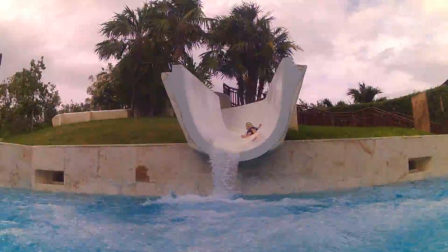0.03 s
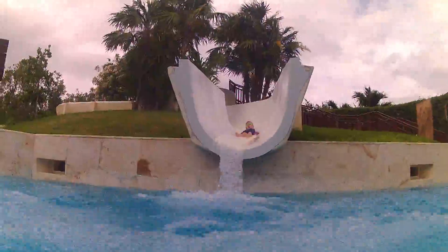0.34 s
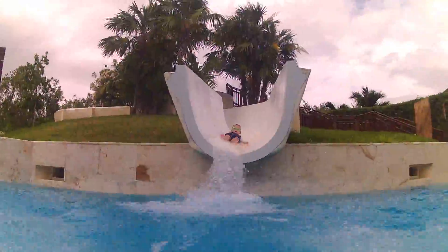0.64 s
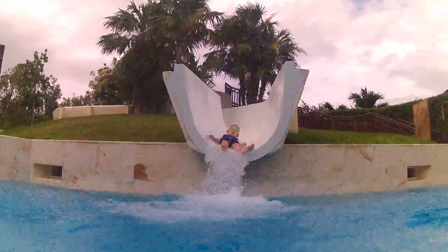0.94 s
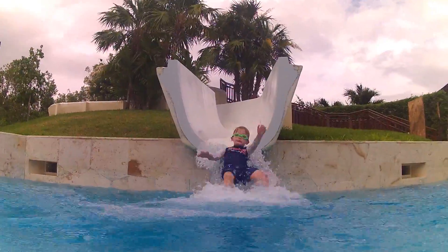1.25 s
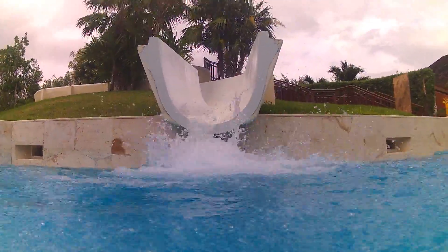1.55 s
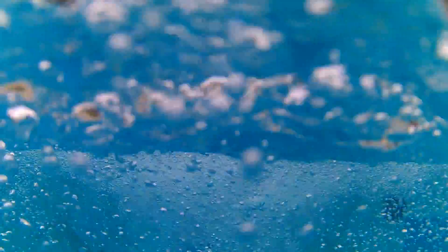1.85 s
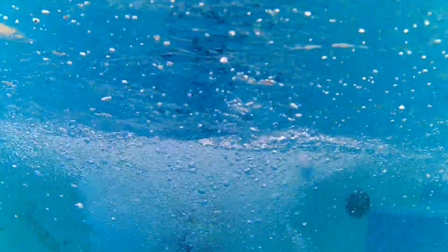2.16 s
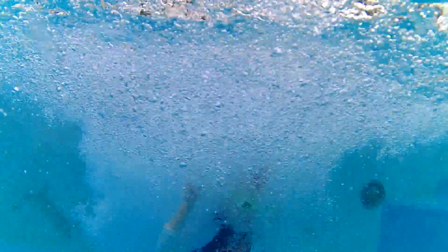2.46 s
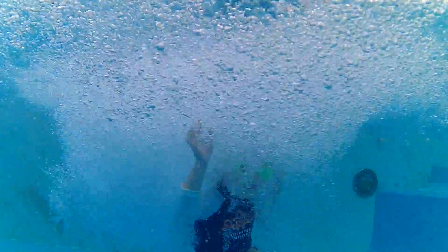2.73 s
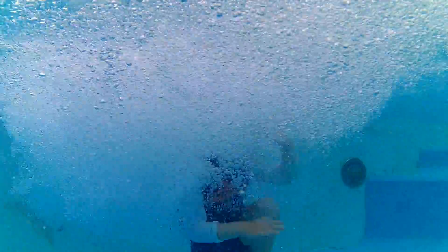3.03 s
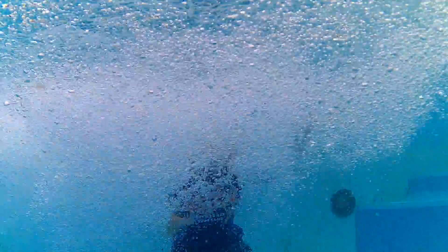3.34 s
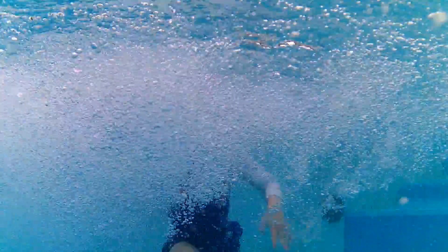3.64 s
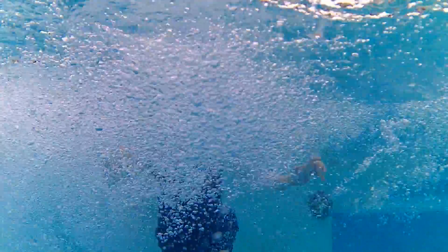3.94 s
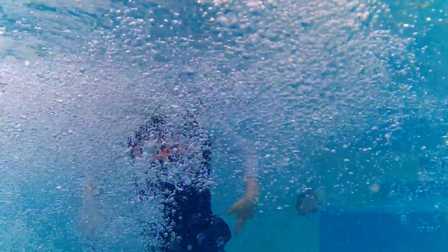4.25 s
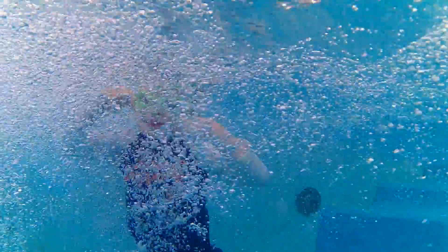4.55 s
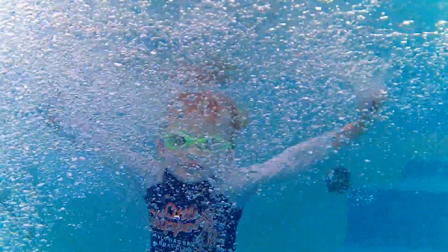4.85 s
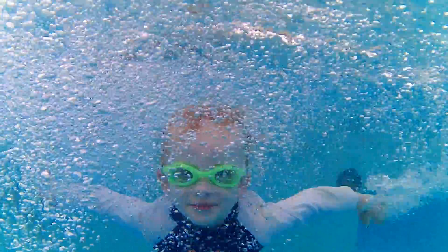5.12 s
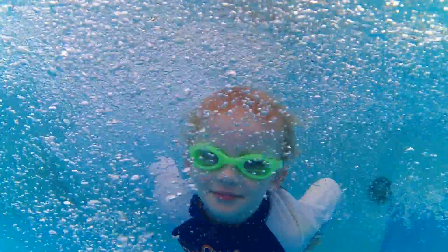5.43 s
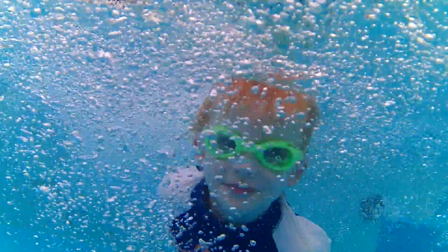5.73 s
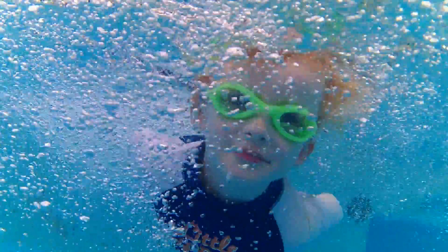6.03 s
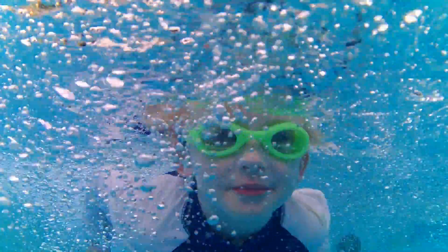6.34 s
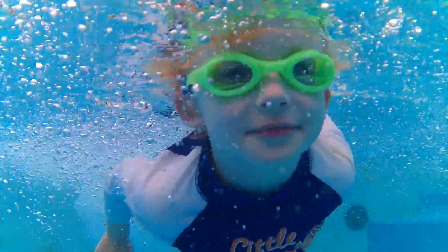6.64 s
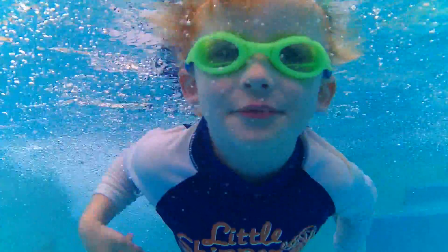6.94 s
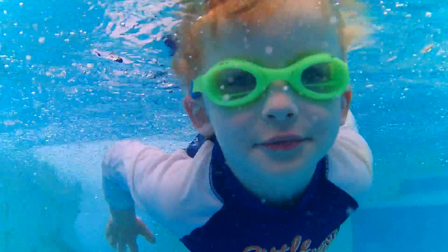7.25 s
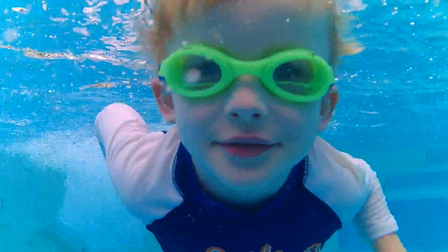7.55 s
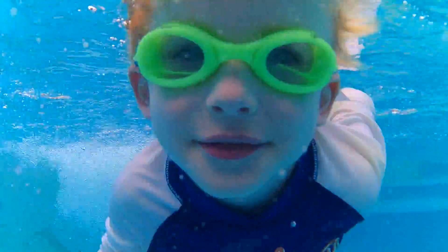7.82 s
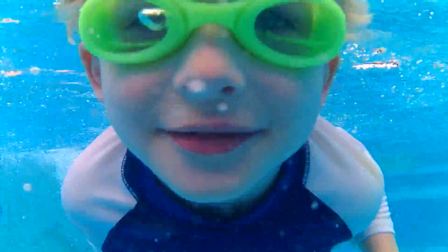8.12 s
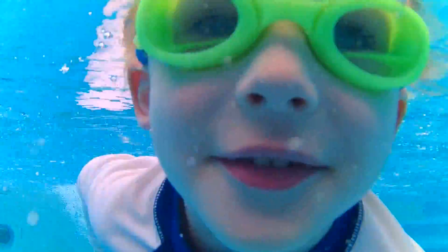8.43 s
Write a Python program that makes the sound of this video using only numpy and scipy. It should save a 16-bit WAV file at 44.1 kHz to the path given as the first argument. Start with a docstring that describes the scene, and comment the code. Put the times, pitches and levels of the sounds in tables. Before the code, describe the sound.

Water pours off a slide into a pool with a soft, steady wash that swells slightly just after 1 second. At about 1.3 seconds a child lands in the water, and loud, close splashes, spray and waves slap and thud against the microphone's waterproof case. Around 1.8 seconds the case dips under, and the slaps turn into deeper gulps. From 2.3 seconds everything is muffled and quieter: a low rumble and a hollow, gurgling boom, with a quick flutter of bubble taps and a strong glug near 2.8 seconds. Small bubbles fizz, trickle and tick, with two sharp clicks just before 4 seconds. The gurgling swells around 5 seconds. Soft bumps touch the case near 5 and 7.5 seconds. Scattered glugs and ticks continue as the boom eases toward the end at about 8.6 seconds. A faint electronic hiss and high whine lie underneath throughout.

```python
"""Off the water slide and under

A child shoots off a water slide into a pool, in front of a camera in a waterproof case at the waterline.
The slide's outflow washes steadily, then spray and waves slap the case and it sinks into the bubbles.
Under water the case booms near 550 Hz and large bubbles glug. Small ones tick, flutter and fizz,
and the case is bumped a few times. The camera's electronics add a faint hiss and whine."""
import sys
import numpy as np
from scipy import signal
from scipy.fft import rfft, irfft
from scipy.io import wavfile
from scipy.ndimage import uniform_filter1d, minimum_filter1d

SR = 44100
rng = np.random.default_rng(int(sys.argv[2]) if len(sys.argv) > 2 else 0)


def store_pcm(level_fs):
    """Save levels as 16-bit WAV."""
    pcm = np.round(np.clip(level_fs, -1, 1) * 32767).astype(np.int16)
    wavfile.write(sys.argv[1], SR, np.atleast_2d(pcm).T)


N = 378378
TIME = np.arange(N) / SR  # seconds through the whole scene
SHORT = np.arange(6000) / SR  # seconds through one short sound

# Tone curves say how strong the lows and highs of a sound are.
# Each row: frequency in Hz, relative strength in dB.
OUTFLOW_TONE = [(20, 5.5), (60, -17), (250, -6), (750, -9.5), (1300, -1), (1550, -8), (1850, 1),
                (2400, -14), (2800, -21), (3100, -18), (3500, -25), (4300, -15.5), (5500, -20),
                (6200, -28.5), (7000, -26.5), (9000, -33.5), (16000, -32)]  # water pouring off the slide
RUMBLE_TONE = [(8.8, -30), (15, 6), (54, 0), (107, 0.5), (151, -15.5), (200, -16.5), (260, -48.5),
               (440, -120)]  # currents pushing on the case
HEAVE_TONE = [(12, -32), (20, -7), (128, -7), (248, -9), (278, -10.5), (344, -12.5), (400, -8.5),
              (520, -16), (880, -120)]  # the low shove of a wave
CLATTER_TONE = [(120, -43), (200, -2.5), (340, -17), (401, -39), (440, -20.5), (579, 1.5), (806, 3),
                (867, 1.5), (1480, -12), (1710, 3.5), (2750, -25.5), (4120, -35.5), (7410, -44),
                (15100, -41), (16000, -22.5)]  # water striking the plastic
SPRAY_CRACK_TONE = [(500, 7), (3000, -3), (6000, 1), (10000, 0), (15000, -1)]  # spray cracking brightly on the bare case
BOOM_TONE = [(150, -39), (300, -17), (400, -7.5), (480, -2), (550, 9), (630, -3), (720, -13), (900, -26.5),
             (1300, -53), (2500, -85.5)]  # the case booming under water
FIZZ_TONE = [(600, 9), (1050, -2.5), (1250, -7.5), (1480, -0.5), (1800, -5.5), (2300, -8), (3000, -10.5),
             (3700, -18), (4300, -11.5), (4900, -18.5), (5600, -16.5), (7000, -25), (14000, -26)]  # tiny bubbles in the cloud
KNOCK_TONE = [(200, -14), (550, 6.5), (1050, -8.5), (1400, -12), (2000, -41), (8000, -51)]  # one bubble tapping the case

# Small bubbles and drops ticking on the case. Each row: start in seconds, ping level in dB, ping pitch
# in Hz, ping ring time in seconds, low note level in dB, low note pitch in Hz, crack level in dB.
BUBBLE_TICKS = [(0.082, -27, 4500, .027, -48, 1820, -62), (.685, -25, 4840, 0.015, -40, 1280, -60),
                (2.472, -36.5, 2950, 0.021, -33.5, 895, -38), (2.624, -34, 4180, .022, -48, 1880, -50),
                (2.641, -34, 5830, .02, -50, 1930, -60), (2.699, -26.5, 2500, 0.019, -52, 970, -47),
                (2.815, -22, 5930, 0.01, -28.5, 826, -29.5), (3.835, -5.5, 2180, 0.019, -30.5, 2010, -27.5),
                (3.895, -52, 2090, .02, -34.5, 975, -65), (3.931, 2.5, 2890, 0.0074, -40, 1790, -42),
                (3.99, -24.5, 5400, 0.011, -41, 1840, -36), (4.031, -41, 3000, 0.018, -37.5, 970, -70),
                (4.275, -16.5, 12400, 0.0047, -30.5, 1910, -29.5),
                (4.566, -24.5, 2740, 0.016, -45, 970, -52), (4.695, -28.5, 3050, 0.02, -61, 836, -71),
                (5.043, -20, 5830, 0.0097, -51, 2420, -36), (5.096, -31, 6200, .0096, -47, 1490, -32.5),
                (5.289, -39, 6200, 0.013, -59, 1390, -65), (5.524, -39, 2800, .017, -27, 895, -60),
                (5.589, -50, 1900, 0.039, -24.5, 1276, -68), (5.795, -29, 3160, .016, -31, 1000, -60),
                (5.81, -12, 2540, 0.0082, -15, 817, -59), (6.409, -39.5, 4180, 0.013, -45, 1220, -70),
                (7.832, -52, 2030, .02, -33.5, 1454, -72), (7.875, -30.5, 4180, 0.015, -59, 1410, -58),
                (7.885, -34, 5150, 0.051, -60, 1390, -48), (8.552, -32.5, 2000, 0.056, -30.5, 860, -61)]
# Waves sloshing over the case.
# Each row: start in seconds, length in seconds, splatter level in dB, heave level in dB.
SLOSHING_WAVES = [(1.25, 0.13, -64, -36), (1.381, 0.017, -22, -25.5), (1.465, 0.16, -20, -21),
                  (1.667, 0.15, -25, -35), (1.829, 0.037, -13, -22), (1.932, 0.091, -22.5, -19.5),
                  (2.031, 0.089, -22, -49), (2.189, 0.054, -44.5, -36.5)]
# Slaps of water on the case. Each row: start in seconds, level in dB, air pocket pitch in Hz,
# spray level in dB, droplet pitch in Hz.
WATER_SLAPS = [(1.331, -25, 1160, -40, 4000), (1.358, -24, 1900, -32.5, 2480), (1.373, -7, 1680, -27, 2920),
               (1.379, -7.5, 1630, -42, 2550), (1.396, 0.5, 1300, -12.5, 3900),
               (1.422, -10, 1200, -27, 2520), (1.441, -7.5, 1740, -16, 3020),
               (1.448, -2, 1890, -19.5, 3760), (1.457, -10.5, 1120, -18, 3970),
               (1.468, 2, 1320, -16.5, 3050), (1.533, 0, 1630, -14.5, 3300), (1.543, -19, 1640, -12, 4660),
               (1.554, -16, 1840, -13, 4650), (1.559, 9, 1282, -5.5, 4310), (1.564, -7, 1280, -9.5, 5080),
               (1.581, -19, 1800, -13, 4230), (1.589, -3.5, 1090, -16, 4360),
               (1.604, -10, 1680, -13.5, 3000), (1.616, -4.5, 1765, -17.5, 2520),
               (1.622, 4, 974, -13, 3170), (1.668, 4.5, 1645, -24, 2520), (1.683, -16, 1690, -21, 3400),
               (1.696, -1, 884, -11, 3400), (1.709, -6, 1090, -19, 3300), (1.72, -6, 1820, -17, 4460),
               (1.751, -2.5, 1680, -18, 2800), (1.757, -25, 1270, -17.5, 2540),
               (1.793, -11, 1230, -18, 3870), (1.821, -12, 960, -9.5, 4590), (1.84, -4.5, 1030, -23, 2480),
               (1.85, -4.5, 477, -8, 3960), (1.856, -4, 845, -7.5, 2340), (1.892, -6, 670, -37, 2520),
               (1.907, -16, 377, -28, 6000), (1.938, -3, 463, -17.5, 3500), (1.945, -2.5, 400, -18, 5600),
               (1.963, -7, 710, -17.5, 3720), (1.983, 1, 633, -32, 3200), (1.997, 3, 560, -11, 2650),
               (2.006, 5, 824, -4.5, 3100), (2.022, -18, 600, -12, 3070), (2.041, 1, 1243, -13, 2350),
               (2.056, -5, 605, -22.5, 4120), (2.075, -3, 514, -13.5, 3440), (2.085, -10.5, 527, -34, 2900),
               (2.098, 1, 1640, -4.5, 4150), (2.118, 2, 495, -18, 2290), (2.127, 2.5, 1580, -18, 4600),
               (2.16, -9, 714, -23, 5600), (2.182, 2.5, 492, -35, 2760), (2.211, -3, 566, -40, 2480),
               (2.22, -6.5, 852, -29.5, 3180), (2.232, -1.5, 490, -38, 3040), (2.24, 1, 586, -22.5, 3200),
               (2.263, -34, 535, -34, 2730), (2.761, -1.5, 602, -40, 2910), (2.767, -10, 610, -33, 3270)]
# Soft bumps on the case. Each row: start in seconds, level in dB, pitch in Hz, ring time in seconds.
CASE_BUMPS = [(1.47, -4.5, 124, 0.022), (1.531, -2.5, 128, 0.033), (1.586, 0, 127, 0.021),
              (1.666, -6.5, 123, 0.029), (4.907, -26.5, 111, 0.086), (4.97, -19, 193, .15),
              (5.072, -22, 231, 0.26), (5.811, -26.5, 113, 0.06), (7.437, -13, 102, 0.087),
              (7.457, -9, 106, 0.17), (7.916, -26.5, 129, 0.091), (8.496, -27, 66.7, 0.31)]
# Large bubbles breaking loose. Each row: start in seconds, level in dB, pitch in Hz, swell in seconds.
BIG_BUBBLES = [(2.196, -7, 954, .0037), (2.644, -10, 556, 0.0073), (2.774, 4, 612, 0.0078),
               (2.971, -17.5, 666, 0.0022), (3.393, -16, 476, .0031), (3.973, -17, 526, .006),
               (4.226, -19, 712, 0.0057), (4.673, -15, 524, .0043), (4.864, -16.5, 510, 0.0028),
               (4.92, -11, 470, 0.002), (4.931, -16.5, 511, 0.012), (4.961, -14.5, 556, .004),
               (5.124, -12, 511, 0.0026), (5.343, -15.5, 510, 0.011), (5.742, -10, 596, 0.0014),
               (5.809, -9, 772, 0.003), (6.313, -10, 572, 0.0028), (6.373, -12, 582, 0.0034),
               (7.348, -16.5, 542, 0.013), (7.655, -17.5, 565, 0.01), (7.942, -9.5, 589, 0.0068),
               (8.55, -4, 534, 0.0015)]
# The bubble cloud, stirred by the swimmer. Each row: time in seconds, boom level in dB, gurgle level in dB.
CLOUD_LEVELS = [(2.271, -19.5, -45), (2.42, -27, -41), (2.721, -15.5, -39.5), (2.9, -19, -42),
                (3.15, -26, -33.5), (3.47, -21.5, -39), (3.8, -25.5, -44), (4.15, -28, -45.5),
                (4.8, -25.5, -36), (4.94, -23.5, -25.5), (5.15, -22.5, -35), (5.55, -27.5, -41),
                (5.76, -23.5, -43), (5.95, -32.5, -44.5), (6.5, -28, -50.5), (7.1, -28, -48),
                (7.42, -24, -44), (8.2, -32.5, -55), (8.58, -34, -54)]
# Trickles of rising bubbles.
# Each row: start in seconds, length in seconds, chirp level in dB, crackle level in dB.
RISING_TRICKLES = [(2.46, 0.47, -48, -63.5), (2.99, 0.16, -52, -63), (3.835, .26, -50.5, -71),
                   (4.845, 0.7, -61, -63.5), (5.483, 0.43, -49.5, -70), (6.21, 0.43, -55, -66.5),
                   (7.015, 0.65, -54.5, -68.5), (7.652, 0.333, -50, -65.5), (8.227, 0.079, -52.5, -64)]

LANDING_S, DIP_S = 1.345, 1.8  # the child hits the water; the case dips in


def amp(db):
    """Turns decibels into a number to multiply a sound by."""
    return 10 ** (np.asarray(db) / 20)


def evened(x):
    """Scales a sound so its average level (rms) is 1."""
    return x / np.sqrt(np.mean(x ** 2) + 1e-20)


def peaked(x):
    """Scales a sound so its highest peak is 1."""
    return x / (abs(x).max() + 1e-12)


def steadied(x, size):
    """Keeps a sound's fine grain but holds its level, averaged over `size` samples, near 1."""
    power = uniform_filter1d(uniform_filter1d(evened(x) ** 2, size), size)
    return evened(x) / np.sqrt(abs(power) + 1e-4)


def add(mix, start, sound):
    """Mixes a sound in at a start time in seconds."""
    part = mix[max(round(start * SR), 0):][:len(sound)]
    part += sound[:len(part)]


def gate(start, end, rise, fall):
    """A volume shape: swells up to the start, stays at 1 until the end, then dies away."""
    return np.exp(-np.maximum(start - TIME, 0) / rise - np.maximum(TIME - end, 0) / fall)


def decay(ring_s):
    """A fade that drops by 60 dB over the ring time."""
    return np.exp(-np.log(1000) * SHORT / ring_s)


def colour(x, tone):
    """Shapes a sound to a tone curve, with a filter that rings only after each hit."""
    hz, db = np.transpose(tone)
    grid_hz = abs(np.fft.fftfreq(8192, 1 / SR))
    curve_db = np.interp(np.log(grid_hz + 1), np.log(hz + 1), np.maximum(db, -100))
    spectrum = np.exp(np.conj(signal.hilbert(np.log(amp(curve_db)))))
    response = np.fft.ifft(spectrum).real[:4096]
    return signal.oaconvolve(x, response)[:len(x)]


def wander(seconds):
    """A smooth random wobble; more seconds make it slower."""
    hz = np.fft.rfftfreq(N, 1 / SR)
    return evened(irfft(rfft(rng.standard_normal(N)) * np.exp(-(hz * seconds) ** 2), N))


def ring(hz, ring_s, rise, glide=0):
    """A bubble or the case rings: a pure note swells and dies, and `glide` bends its pitch up."""
    ring_s = max(ring_s, 1e-3)
    pitch = hz * (1 + glide * np.minimum(SHORT / ring_s, 1))
    note = np.sin(2 * np.pi * np.cumsum(pitch) / SR)
    return peaked(note * (1 - np.exp(-SHORT / rise)) * decay(ring_s))


def bubbles(low_hz, high_hz, per_s, cycles, spread_db, sizes=24):
    """A swarm of bubbles of many sizes, each ringing for about the same number of cycles."""
    out = np.zeros(N)
    for hz in np.geomspace(low_hz, high_hz, sizes) * rng.uniform(0.872, 1.005, sizes):
        when, chance, softness = rng.random((3, 4000))
        born = chance < per_s * N / SR / sizes / len(when)
        strength = amp(-spread_db * np.log(0.019 + softness)) * rng.choice([-1, 1], len(when))
        births = np.bincount((when * N).astype(int), born * strength, N)
        out += signal.oaconvolve(births, ring(hz, cycles / hz, 0.5 / hz, glide=0.27))[:N] * np.sqrt(hz)
    return evened(out)


def stirring():
    """How many dB the bubble cloud's boom is above its usual level."""
    times, boom_db, _ = np.transpose(CLOUD_LEVELS)
    usual_db = -26
    return np.interp(TIME, times, boom_db) - usual_db


def outflow():
    """Water pours off the slide, swells as the child pushes it ahead, and is lost in the splash."""
    wash = rng.standard_normal(N) * amp(wander(0.028))
    droplets = amp(-10) * bubbles(432, 6480, per_s=1400, cycles=43, spread_db=3)
    water = evened(colour(wash + droplets, OUTFLOW_TONE))
    push = np.clip((TIME - 1.093) / 0.034, 0, 1)
    return water * amp(-38 + 4.5 * push) * gate(0.039, LANDING_S, rise=0.00069, fall=0.091)


def rumble():
    """Currents push on the case, harder once the child lands, and it is bumped now and then."""
    afloat_db, stirred_db = -49.5, -41 + 0.15 * stirring()
    landed = np.clip((TIME - LANDING_S) / 0.098, 0, 1)
    push_db = (1 - landed) * afloat_db + landed * stirred_db
    out = steadied(colour(rng.standard_normal(N), RUMBLE_TONE), size=9000) * amp(push_db)
    for start, db, hz, ring_s in CASE_BUMPS:
        add(out, start, amp(db) * ring(hz, ring_s, rise=0.0025))
    return out


def electronics():
    """The camera hisses faintly and gives a thin whine, which buzzes as its wave keeps flipping over."""
    whine_hz, flips_per_s = 13300, 82.2
    flips = np.sign(np.sin(np.pi * flips_per_s * TIME))
    whine = np.sqrt(2) * np.sin(2 * np.pi * whine_hz * TIME) * flips
    return amp(-54.5) * whine + amp(-60) * rng.standard_normal(N)


def snap(ring_s):
    """The thin, bright edge of a bursting bubble."""
    burst = rng.standard_normal(len(SHORT)) * decay(ring_s)
    return peaked(colour(burst, [(500, -23.5), (2000, 20.5), (5000, 7.5), (7500, 0), (15000, -3.5)]))


def ticks():
    """Small bubbles burst close by: a rattling ping, a lower air pocket with a smaller twin, a crack."""
    out = np.zeros(N)
    for start, db, hz, ring_s, low_db, low_hz, crack_db in BUBBLE_TICKS:
        ping = ring(hz, ring_s, rise=0.00033, glide=0.099)
        rattle = signal.oaconvolve(snap(0.011), ring(hz * 1.134, 6 / hz, rise=0.0001))
        burst = amp(db - 6.5) * (ping + peaked(rattle[:len(SHORT)]))
        pocket = amp(low_db + 8) * ring(low_hz, 0.032, rise=0.00088, glide=0.06)
        twin = amp(low_db - 2) * ring(low_hz * 1.3, 0.03, rise=0.0007, glide=0.1)
        add(out, start, burst + pocket + amp(crack_db + 7) * snap(0.004))
        add(out, start + 0.002, twin)
    return out


def waves():
    """Each wave brings foam, spray and a low heave; once the case dips in, each also gulps air down."""
    foam_tone = [(250, -33), (500, 1.5), (1000, 19.5), (1700, 18.5), (2400, -2), (3200, -42), (8000, -56.5)]
    foam = evened(colour(rng.standard_normal(N), foam_tone))
    splatter = steadied(foam + bubbles(590, 2240, per_s=1300, cycles=8.5, spread_db=7.5), size=1500)
    drops = rng.standard_normal(N) * (rng.random(N) < 1400 / SR)  # about 1400 a second
    drops *= amp(9.9 * np.minimum(rng.exponential(1, N), 4))  # a few hit much harder
    patter = evened(colour(drops, [(800, -2), (2500, 7), (4300, 9.5), (7000, -25), (15000, 6.5)]))
    plinks = amp(-6) * bubbles(2600, 7500, per_s=810, cycles=36, spread_db=3.5)
    spray = steadied(patter + plinks, size=1500)
    heave = evened(colour(rng.standard_normal(N), HEAVE_TONE))
    gulp = steadied(bubbles(402, 967, per_s=420, cycles=36, spread_db=-1), size=1200)
    wet = amp(-1) * splatter + amp(-12.5) * spray
    out = np.zeros(N)
    for start, length, splatter_db, heave_db in SLOSHING_WAVES:
        wave = amp(splatter_db) * wet + amp(heave_db - 3.5) * heave + amp(-20) * (start > DIP_S) * gulp
        out += wave * gate(start, start + length, rise=0.0066, fall=0.026)
    return out


def slaps():
    """Each slap clatters on the case, traps a ringing pocket of air, throws a droplet and thuds."""
    out = np.zeros(N)
    for start, db, pocket_hz, spray_db, drop_hz in WATER_SLAPS:
        strike = rng.standard_normal(len(SHORT)) * decay(0.024)
        clatter = amp(-11.5) * peaked(colour(strike, CLATTER_TONE))
        pocket = amp(-3) * ring(pocket_hz, 0.014 + 9 / pocket_hz, rise=0.00031, glide=0.23)
        thud = amp(-36) * ring(132, 0.059, rise=0.0013)
        droplet = amp(1.5) * ring(drop_hz, 0.015, rise=0.00024, glide=0.047)
        crack = amp(6) * peaked(colour(snap(0.012), SPRAY_CRACK_TONE))
        add(out, start, amp(db) * (clatter + pocket + thud) + amp(spray_db) * (droplet + crack))
    return out


def glugs():
    """A large bubble swells over a few cycles and leaves the case ringing."""
    out = np.zeros(N)
    for start, db, hz, swell_s in BIG_BUBBLES:
        age = SHORT / swell_s
        swell = age ** 2 * np.exp(2 * (1 - age))
        tail = amp(1.5) * (1 - np.exp(-age)) * np.exp(-SHORT / 0.014)
        add(out, start, amp(db - 5) * (swell + tail) * np.sin(2 * np.pi * hz * SHORT))
    return out


def cloud():
    """Countless bubbles set the case booming; large ones gurgle below, tiny ones fizz above."""
    times, boom_db, gurgle_db = np.transpose(CLOUD_LEVELS)
    boom = evened(colour(rng.standard_normal(N) * amp(2.6 * wander(0.02)), BOOM_TONE))
    boom += amp(-6) * bubbles(466, 668, per_s=45, cycles=33, spread_db=2, sizes=8)
    boom = steadied(boom, size=4500) * amp(np.interp(TIME, times, boom_db) - 4.5)
    gurgle = bubbles(126, 430, per_s=260, cycles=9.9, spread_db=0, sizes=14)
    gurgle = steadied(gurgle, size=4000) * amp(np.interp(TIME, times, gurgle_db) - 1)
    pings = amp(-8) * bubbles(950, 6500, per_s=200, cycles=50, spread_db=3.4, sizes=36)
    fizz = evened(colour(rng.standard_normal(N) * amp(wander(0.026)) + pings, FIZZ_TONE))
    seconds_under = TIME - times[0]
    fizz_db = -49.5 + 0.36 * stirring() + 0.6 * seconds_under  # grows as the cloud drifts nearer
    fizz *= amp(fizz_db) * np.clip(seconds_under / 0.15, 0, 1)
    return (boom + gurgle) * gate(times[0], times[-1], rise=0.043, fall=0.043) + fizz


def flutter():
    """Bubbles pinch off unevenly and tap the case; the knocks fade, and later taps ring brightly."""
    start_s, bright_s, end_s = 2.28, 2.41, 2.72
    taps_per_s, fade_db_per_s = 74, 39.5
    tap_count = np.floor(np.cumsum(taps_per_s * np.maximum(1 + 0.3 * wander(0.006), 0)) / SR)
    force = amp(np.clip(5 * rng.standard_normal(N) - 1, -14, 4))
    taps = np.diff(tap_count, prepend=0) * force * gate(start_s, end_s, rise=0.0055, fall=0.0069)
    fading = amp(-14 - fade_db_per_s * np.maximum(TIME - start_s, 0))
    knock = peaked(colour(signal.unit_impulse(len(SHORT)), KNOCK_TONE))
    knocks = signal.oaconvolve(taps * fading, knock)
    bright = amp(-33.5) * signal.oaconvolve(taps * (TIME > bright_s), ring(1940, 0.0085, rise=0.00035))
    muffle = signal.butter(6, 2350, fs=SR, output="sos")
    return signal.sosfilt(muffle, (knocks + bright)[:N])


def trickles():
    """Strings of bubbles rise past the case: middle-sized ones chirp, the finest crackle."""
    chirps = steadied(bubbles(926, 1820, per_s=140, cycles=61, spread_db=5, sizes=16), size=9000)
    crackle = steadied(bubbles(3180, 6480, per_s=130, cycles=79, spread_db=7.5, sizes=12), size=9000)
    out = np.zeros(N)
    for start, length, chirp_db, crackle_db in RISING_TRICKLES:
        trickle = amp(chirp_db) * chirps + amp(crackle_db) * crackle
        out += trickle * gate(start, start + length, rise=0.018, fall=0.025)
    return out


def scene():
    """Everything the one microphone inside the case picks up."""
    splash = amp(4) * (waves() + slaps())
    water = outflow() + splash + cloud() + rumble() + glugs() + ticks() + trickles() + flutter()
    return (water + electronics())[None]


def record(dry):
    """The camera turns down briefly after an overload, flattens peaks and cuts the highest treble."""
    bass = signal.sosfilt(signal.butter(2, 170, fs=SR, output="sos"), dry)
    loudness = abs(dry) + 2 * abs(bass)  # bass sets it off most easily
    held_peak = -minimum_filter1d(-loudness, 6615, origin=3307)  # loudest in the last 0.15 seconds
    cut_db = np.clip(4 * (20 * np.log10(held_peak + 1e-9) + 4), 0, 6)
    smooth_cut_db = signal.lfilter([1 / 350], [1, 1 / 350 - 1], cut_db)
    lowered = dry * amp(-smooth_cut_db)
    flattened = lowered / (1 + (lowered / 0.66) ** 6) ** (1 / 6)
    treble_cut = signal.firwin(511, 16100, window=("kaiser", 9), fs=SR)
    return signal.oaconvolve(flattened, treble_cut[None], "same")


dry = scene()
out = record(dry)
store_pcm(out)
```